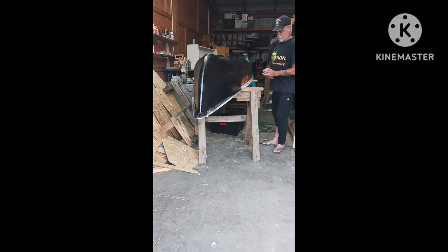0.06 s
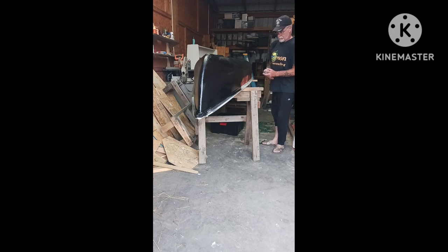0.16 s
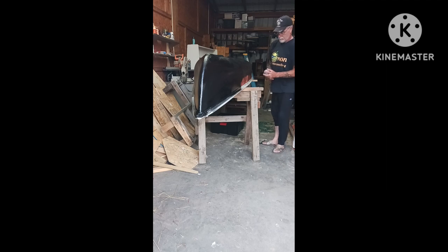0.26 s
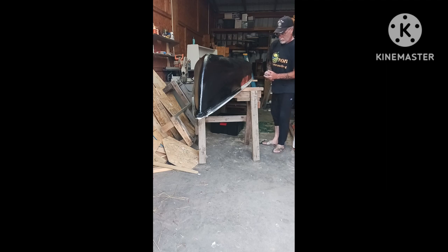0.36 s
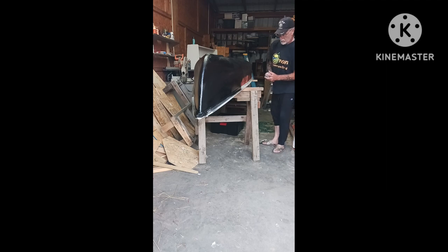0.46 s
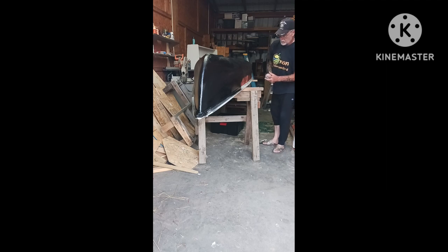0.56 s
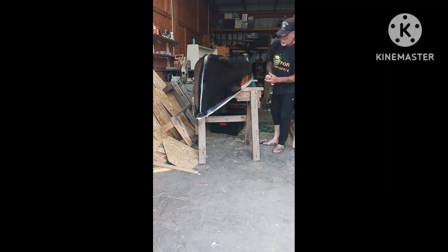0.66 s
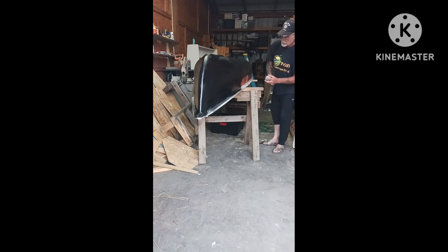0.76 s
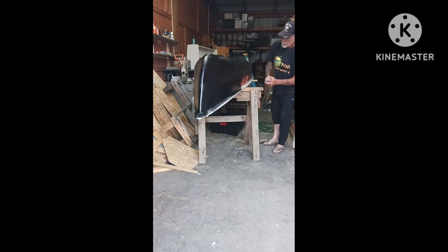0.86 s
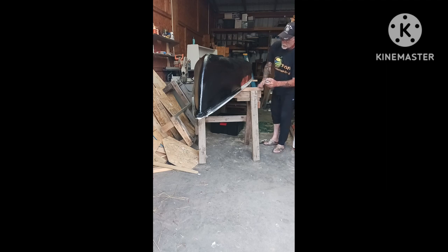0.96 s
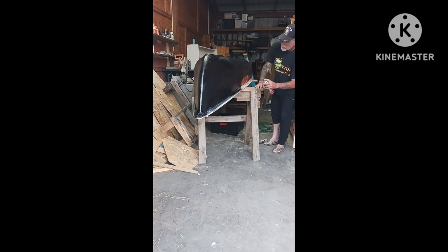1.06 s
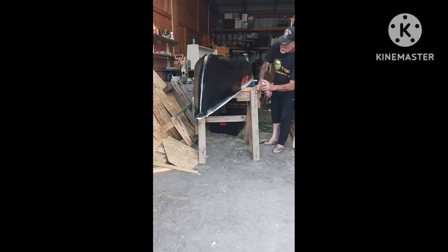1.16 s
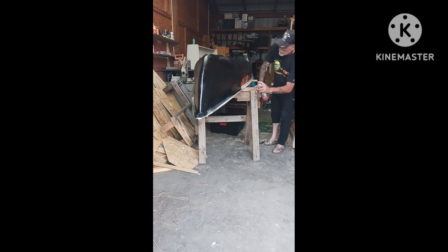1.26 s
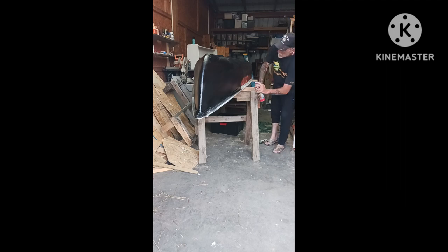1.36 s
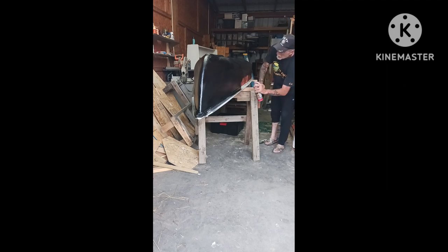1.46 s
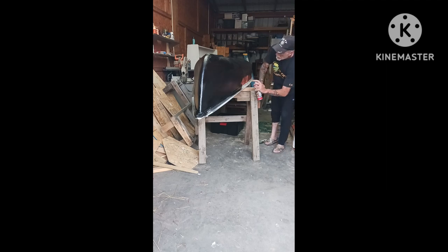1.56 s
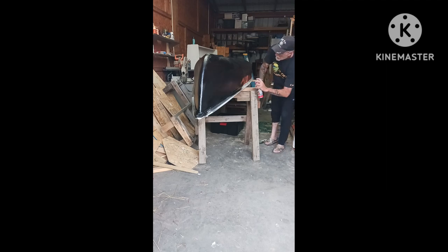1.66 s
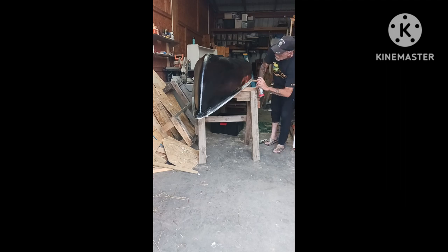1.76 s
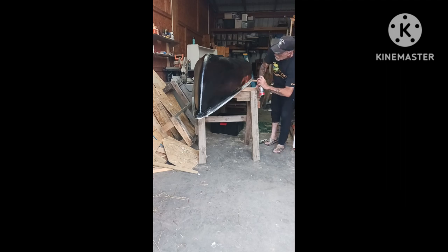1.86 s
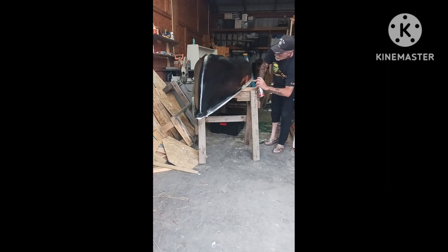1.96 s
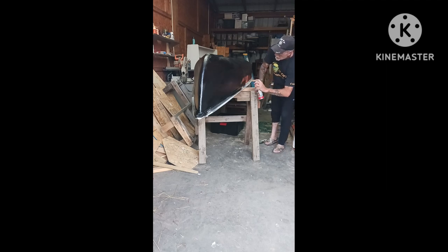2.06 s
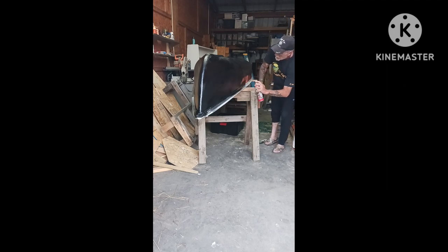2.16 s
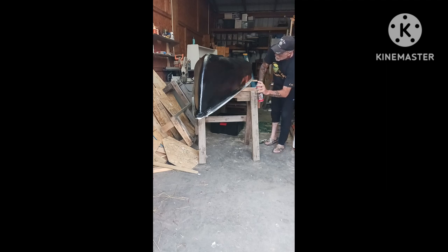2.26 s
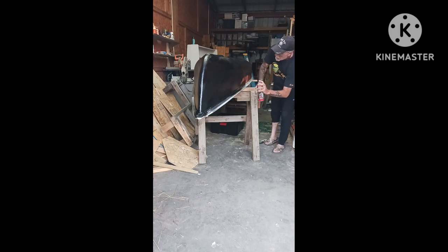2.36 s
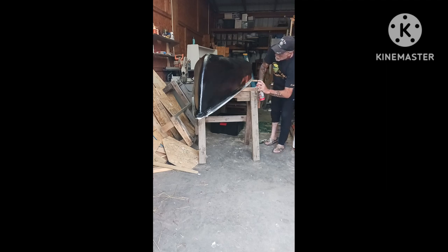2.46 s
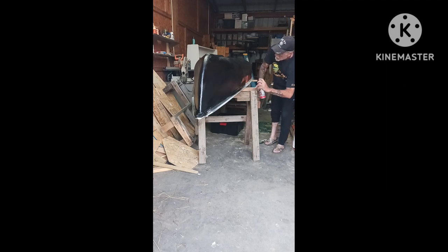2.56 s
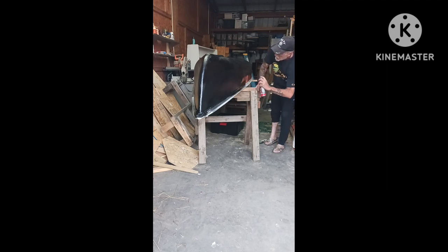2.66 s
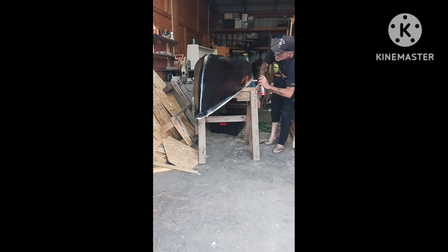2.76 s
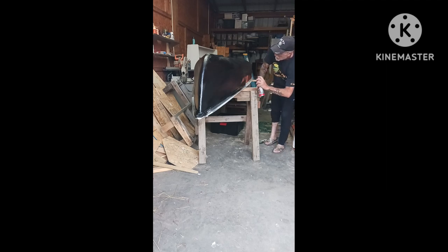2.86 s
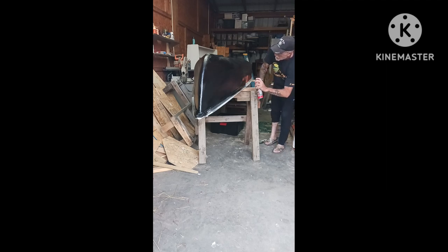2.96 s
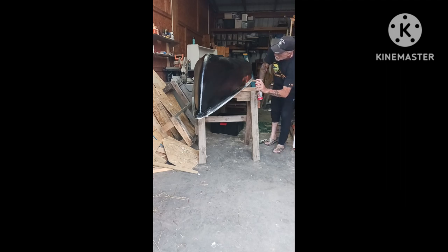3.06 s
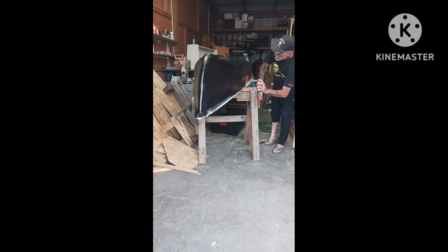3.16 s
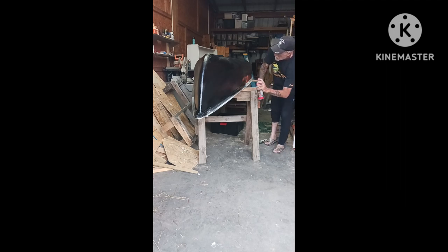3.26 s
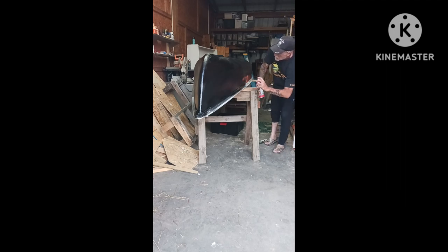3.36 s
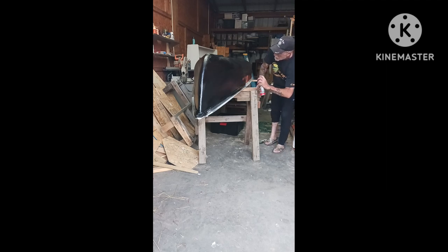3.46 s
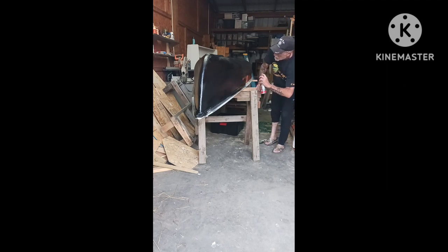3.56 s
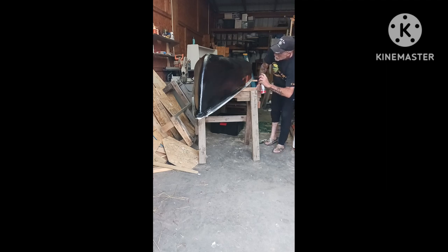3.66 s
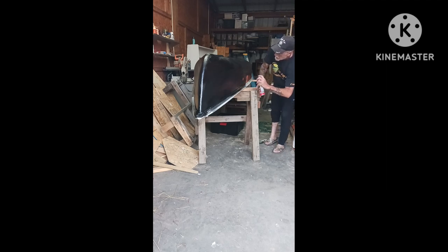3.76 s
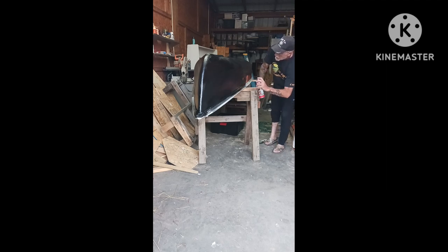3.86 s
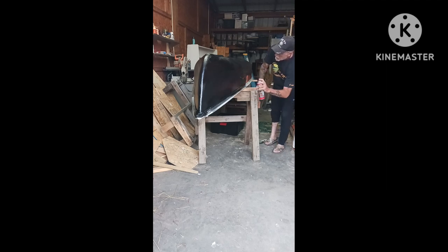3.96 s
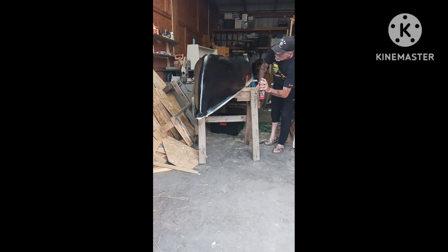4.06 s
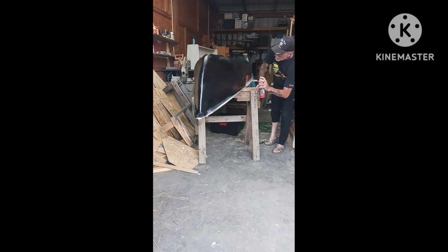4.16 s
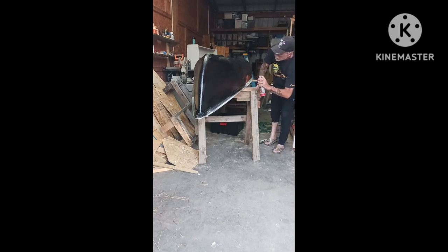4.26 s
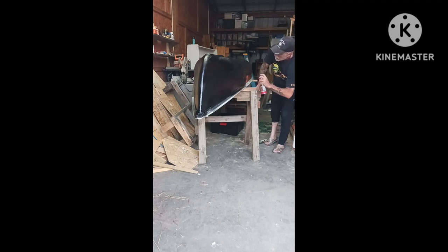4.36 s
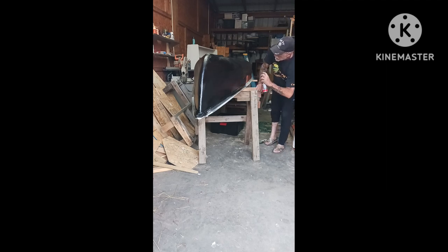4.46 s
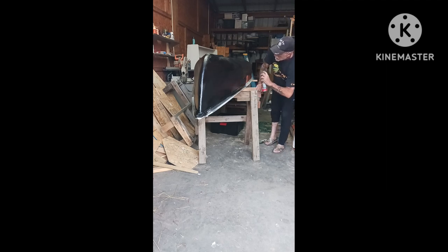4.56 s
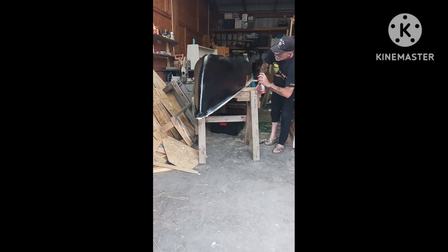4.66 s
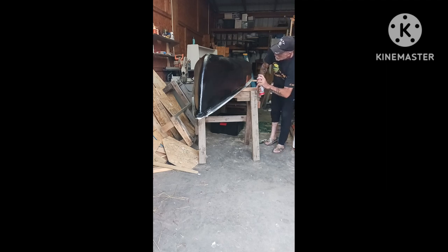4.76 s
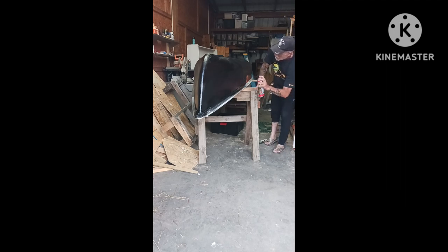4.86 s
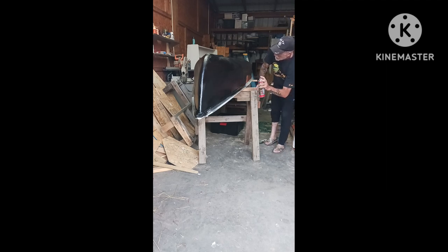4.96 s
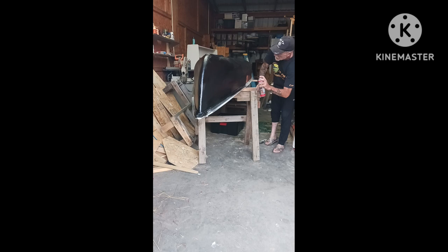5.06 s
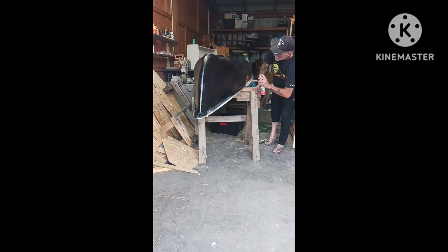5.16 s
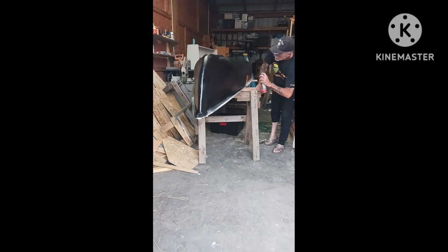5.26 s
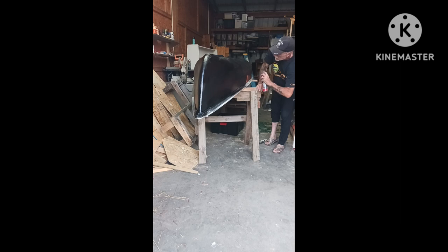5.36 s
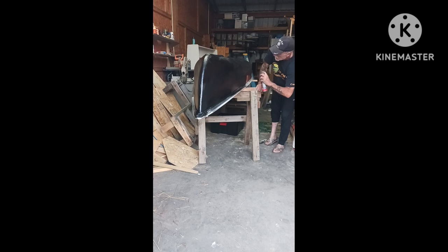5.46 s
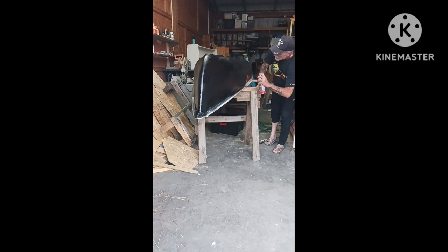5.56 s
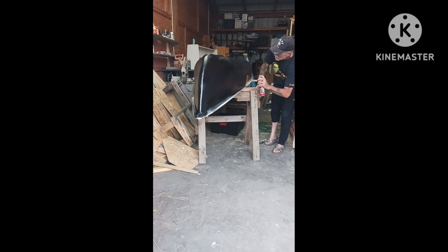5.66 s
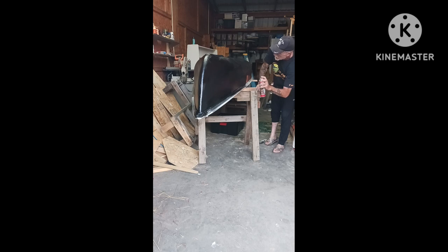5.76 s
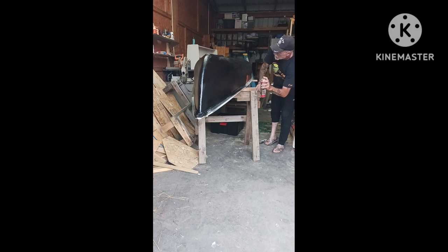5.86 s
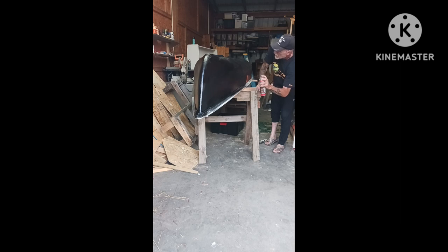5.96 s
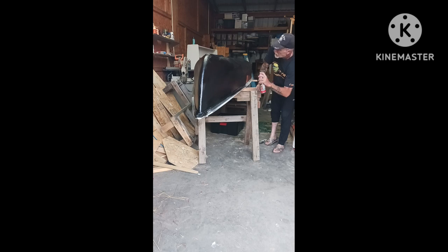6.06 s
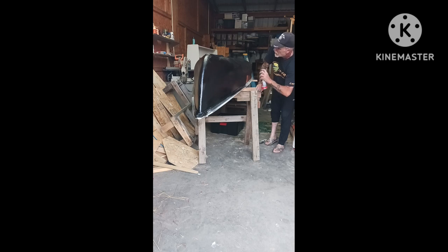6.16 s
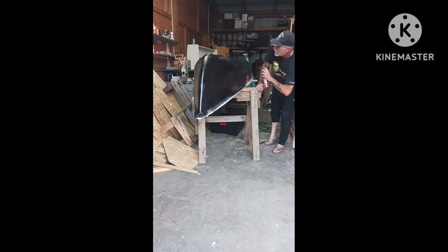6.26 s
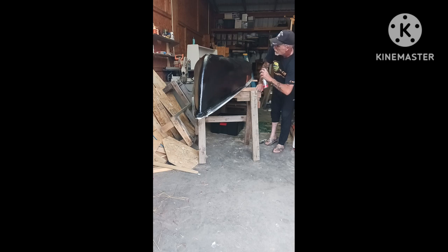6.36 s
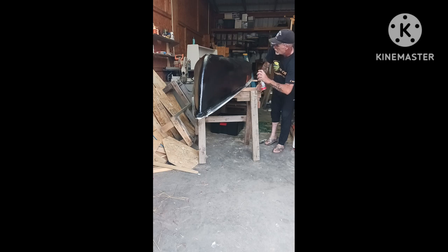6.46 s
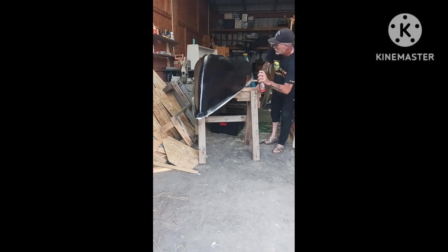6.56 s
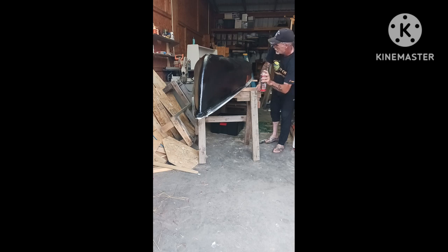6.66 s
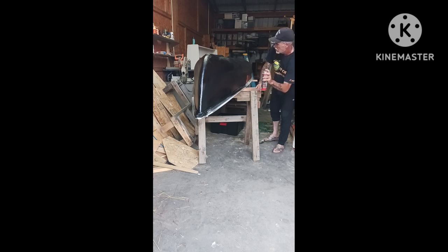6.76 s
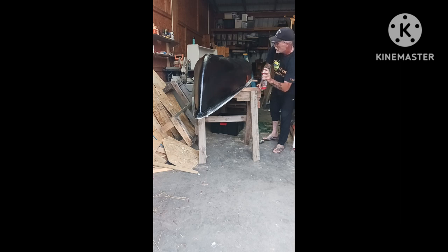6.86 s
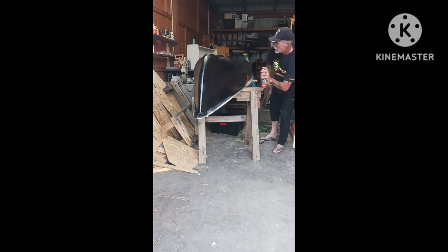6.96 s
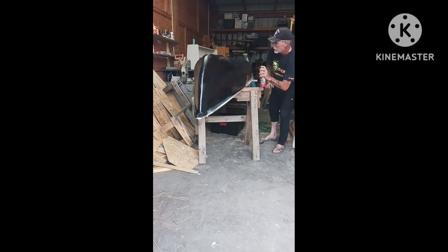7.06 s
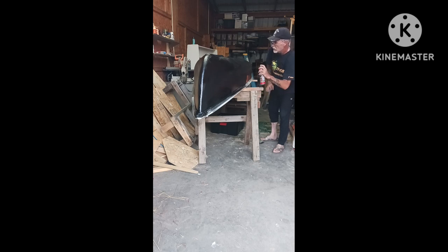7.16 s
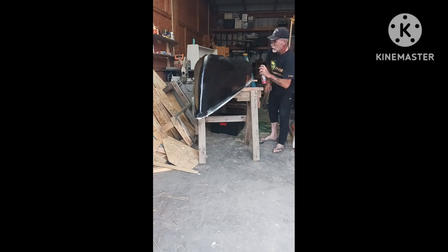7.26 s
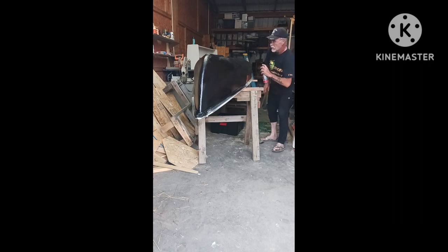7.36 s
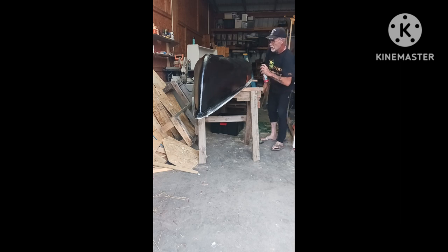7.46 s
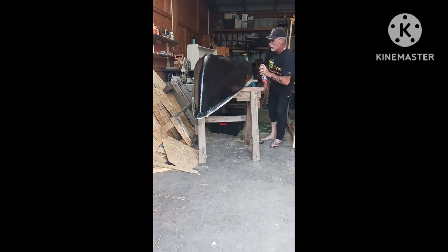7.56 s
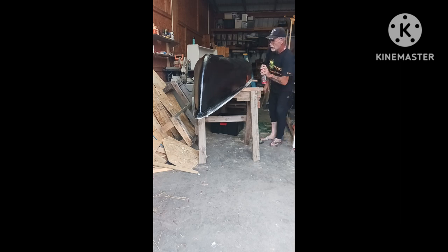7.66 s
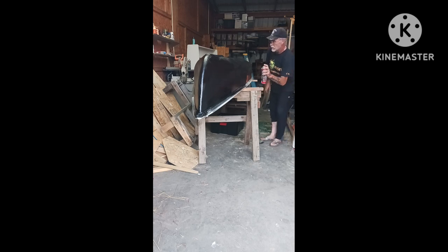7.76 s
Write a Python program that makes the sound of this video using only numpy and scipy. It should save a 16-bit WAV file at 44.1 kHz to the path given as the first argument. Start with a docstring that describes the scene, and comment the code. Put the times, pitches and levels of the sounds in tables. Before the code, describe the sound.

In a roomy workshop, sandals scrape gritty concrete during the first second, with tiny sharp grit cracks. From about one and a half seconds an aerosol can sprays a boat hull in fourteen crisp bursts, about two each second, alternating steady and brightening. A deep hum swells and sinks beneath soft air noise. Stereo microphone a few steps away; short diffuse room tails.

```python
"""Spray painting in a workshop

An aerosol can sprays a boat hull in fourteen short bursts: turbulent hiss, gated by a valve and combed by an echo.
Sandals scuff gritty concrete as trains of random grains, and single larger grains crack as decaying ticks.
The shed answers with diffuse noise tails that die at a different speed in each band.
A wavering low tone swells and sinks beside a faint drone, under the steady filtered noise of the air."""
import sys
import numpy as np
from scipy import signal
from scipy.fft import rfft, irfft, next_fast_len
from scipy.io import wavfile
from scipy.ndimage import map_coordinates

SR = 44100
rng = np.random.default_rng(int(sys.argv[2]) if len(sys.argv) > 2 else 0)


def file_out(sig):
    """Save sig as 16-bit WAV at sys.argv[1]."""
    # one column per channel
    cols = np.atleast_2d(sig).T
    # limit, then scale
    lim = np.clip(cols, -1, 1)
    pcm = np.round(lim * 32767).astype(np.int16)
    wavfile.write(sys.argv[1], SR, pcm)


N = 344862

# slow level of the hum, before its throb: (t/s, level/dB)
HUM_LEVEL = [(0.0, -49), (0.38, -59.5), (0.72, -49), (1.38, -62.5), (1.53, -39.5), (1.65, -41.5),
             (2.05, -59), (3.05, -55), (3.6, -79), (3.9, -55), (4.7, -71), (4.9, -52), (5.2, -48.5),
             (5.33, -60), (5.52, -42), (6.6, -40.5), (7.45, -43.5), (7.62, -52.5), (7.82, -46)]
HUM_HZ = 58.9  # mean pitch
HUM_STEADY_DB = -53  # above this level the hum is a clean tone, below it a fluttering rumble
THROB_S, THROB_DB, THROB_TOP_S = 0.773, 1.3, 6.63  # period, depth, time of one crest

# relative spectrum of the still air: (f/Hz, level/dB per Hz)
AIR_SPECTRUM = [(25, -27), (45, -3.5), (75, 2.5), (140, -2.5), (220, -7), (480, -8), (700, -17),
                (1500, -13.5), (2200, -23.5), (3400, -13), (7000, -14), (9000, -29.5), (11000, -30.5),
                (15000, -25)]
# left-right correlation of all diffuse sound in the shed: (f/Hz, correlation/1)
DIFFUSE_ALIKE = [(100, 0.92), (450, 0.88), (900, 0.42), (1800, 0.33), (3000, 0.0)]

# drags of a sole on concrete: (hardest push t/s, build-up/s, let-go/s, relative level/dB,
# weight on the foot as extra low-mid level/dB)
SCUFFS = [(0.121, 0.061, 0.038, -35, -1.5), (0.65, 0.24, 0.25, -56, -6), (0.87, 0.29, 0.14, -51.5, -3),
          (1.0, 0.071, 0.19, -58.5, 5), (6.03, 0.32, 0.08, -66, 7), (6.87, 0.12, 0.2, -60, -6),
          (7.497, 0.052, 0.025, -45.5, 2.5), (7.715, 0.067, 0.044, -38, 3.5)]
# relative spectrum of the rubbing sole: (f/Hz, level/dB per Hz)
SOLE_SPECTRUM = [(400, -20), (900, -25.5), (1400, -9), (2000, -5), (2700, -2.5), (3700, -1), (5000, -8),
                 (7000, -11.5), (10000, -12), (13000, -11), (15500, -22)]
# relative spectrum of the ticks of loose grit: (f/Hz, level/dB per Hz)
LOOSE_SPECTRUM = [(500, -20), (1500, -4), (3500, 5), (6000, -8), (13000, -9), (15500, -10)]
SCUFF_FADE_DB = -16  # relative pressure one build-up before the hardest push, and one let-go after it
SCUFF_LAND_S = 0.0079  # time for the sole to make contact
WEIGHT_HZ = 2410  # weight on the foot acts below this
RUB_STRAIGHT_HZ = 3440  # above this the rub is heard only through the shed

# reverberation time of the shed: (f/Hz, t60/s)
SHED_T60 = [(500, 0.37), (3500, 0.36), (8000, 0.25), (14000, 0.27)]

# grit cracking under a sole: (t/s, relative level/dB, ring f/Hz, share that rings/1)
GRIT_CRACKS = [(0.546, -34.5, 3420, 0.2), (0.8075, -40, 3620, 0), (0.9075, -39, 9000, 0.2),
               (0.974, -37, 3950, 0.4), (1.064, -43, 7000, 0.05), (7.468, -33.5, 3300, 0.2)]

# presses of the nozzle: (valve opens t/s, valve shuts t/s, relative hiss level at mid-stroke/dB,
# rise of the hiss over the stroke as the can turns/dB)
BURSTS = [(1.533, 1.875, -35.5, -3), (1.997, 2.298, -36.5, 8), (2.47, 2.782, -37, 0.5),
          (2.899, 3.182, -36.5, 6.5), (3.325, 3.633, -36.5, 0), (3.772, 4.07, -36.5, 6.5),
          (4.231, 4.549, -36.5, 0.5), (4.672, 4.961, -37, 7.5), (5.125, 5.437, -36.5, -1.5),
          (5.569, 5.861, -36, 5.5), (6.012, 6.298, -36, -2), (6.431, 6.682, -36.5, 6),
          (7.062, 7.402, -37, 0), (7.535, 7.807, -36, 8)]
# relative spectrum of the jet: (f/Hz, level/dB per Hz)
JET_SPECTRUM = [(500, -21), (900, -27.5), (1500, -14.5), (2200, -11.5), (2750, -7.5), (3600, -1),
                (4200, -3.9), (5000, -5.5), (5900, -10.5), (7300, -7), (10000, -7.5), (11200, -3.5),
                (12600, -0.5), (15500, 1.5)]
STROKE_END_DB = -1.2  # the can points a little aside at both ends of a stroke
BODY_DB, BODY_SWING = 0.2, 0.36  # body of the jet: level against the hiss, share of the turn it follows
SPIT_DB, SPIT_S = 2.5, 0.058  # pressure stored behind the valve spits as it opens
# gain of the part of the jet that gets straight past the hull: (f/Hz, level/dB)
DIRECT_GAIN = [(1800, -11.5), (2900, 3.5), (3900, 0.5), (5200, -8), (8000, -6.5), (14000, -3.5)]
# phase by which the straight sound of the can leads at the left port: (f/Hz, phase/rad)
LEAD_PHASE = [(100, 0), (1200, 0.4), (2000, 1.1), (2400, 2.2), (2850, 3.1), (3300, 3.4), (3700, 4.5),
              (4200, 6.1), (6700, 6.9), (7900, 9.4), (10000, 10), (13000, 12.5), (15000, 14)]

# colour of the two microphone ports: (f/Hz, left minus right level/dB)
PORT_COLOUR = [(150, 0), (450, 2), (1050, 6.5), (1700, 0), (3500, -0.5), (5000, 0), (6700, -6.5),
               (7600, 0.5), (9700, 4), (11500, 5), (14500, 1)]
EDGE_HZ = 15600  # upper band limit


def gain_of(db):
    """Logarithmic levels: decibels to amplitude gain."""
    return 10 ** (np.asarray(db) / 20)


def evened(x):
    """Normalization of power: scales x to rms 1."""
    return x / np.sqrt(np.mean(x ** 2) + 1e-20)


def read(points, hz):
    """Interpolation of a spectrum on a log-frequency axis."""
    f, value = np.transpose(points)
    return np.interp(np.log(hz + 1), np.log(f + 1), value)


def follow(rows):
    """Linear interpolation of a time curve at every sample."""
    return np.interp(np.arange(N) / SR, *np.transpose(rows))


def coloured(x, gain):
    """Linear filtering: multiplies the spectrum of x by a function of frequency."""
    size = next_fast_len(N + 4096)
    response = gain(np.fft.rfftfreq(size, 1 / SR))
    return irfft(rfft(x, size) * response, size)[..., :N]


def shaped(x, spectrum):
    """Spectral shaping: filters x by a tabulated spectrum, at rms 1."""
    return evened(coloured(x, lambda hz: gain_of(read(spectrum, hz))))


def below(x, edge_hz, order=6):
    """Low-pass filtering without phase shift."""
    return coloured(x, lambda hz: 1 / (1 + (hz / edge_hz) ** order))


def wander(rate_hz):
    """Slow random fluctuation: low-passed noise of rms 1, up to about the given rate."""
    return evened(below(rng.standard_normal(N), rate_hz, order=4))


def late(x, delay_ms):
    """Propagation delay: x after a fixed or moving delay."""
    return map_coordinates(x, [np.arange(N) - delay_ms * SR / 1000], order=3, mode="constant")


def hum(waver=0.11, drift_hz=0.28, flutter_hz=9, flutter_db=-1.5, drone_hz=187.3, drone_db=-78.0):
    """Amplitude and frequency modulation: a tone, steady when loud and fluttering when weak, and a drone."""
    throb_turns = (np.arange(N) / SR - THROB_TOP_S) / THROB_S
    level = gain_of(follow(HUM_LEVEL) + THROB_DB * np.cos(2 * np.pi * throb_turns))
    steady = 1 / (1 + (gain_of(HUM_STEADY_DB) / level) ** 4)
    # a complex random envelope turns the tone into narrow-band noise
    flutter = gain_of(flutter_db) * (wander(flutter_hz) + 1j * wander(flutter_hz)) / np.sqrt(2)
    swing = np.sqrt(steady) * (1 + waver * wander(21)) + np.sqrt(1 - steady) * flutter
    turns = np.cumsum(HUM_HZ + drift_hz * wander(2.1)) / SR
    low = level * (swing * np.exp(2j * np.pi * turns)).real
    drone_turns = np.cumsum(drone_hz + wander(2.64)) / SR
    drone = gain_of(drone_db) * np.sin(2 * np.pi * drone_turns)
    return np.sqrt(2) * (low + drone)  # sine of amplitude sqrt(2) has rms 1


def diffuse_alike(hz):
    """Spatial coherence of the diffuse field at the two ports."""
    return np.clip(read(DIFFUSE_ALIKE, hz), -1, 1)


def air(air_db=-54, swell_db=0.5, rumble_db=-19.5, rumble_hz=135, rumble_width_hz=70):
    """Partly coherent noise: diffuse air, and a resonant rumble whose level follows the hum."""
    left, other, rumble_noise = rng.standard_normal((3, N))
    right = coloured(left, diffuse_alike) + coloured(other, lambda hz: np.sqrt(1 - diffuse_alike(hz) ** 2))
    still = shaped(np.array([left, right]), AIR_SPECTRUM) * gain_of(air_db + swell_db * wander(2.65))

    def rumble_gain(hz):
        """Resonance curve with an added roll-off above 600 Hz."""
        detuning = (hz - rumble_hz ** 2 / (hz + 1)) / rumble_width_hz
        return 1 / np.hypot(1, detuning) / (1 + (hz / 600) ** 4)

    rumble = evened(coloured(rumble_noise, rumble_gain))
    return still + rumble * gain_of(follow(HUM_LEVEL) + rumble_db)


def drag(push, build_s, let_go_s):
    """Frictional loading: the sole lands, builds to its hardest push and lets go."""
    t = np.arange(N) / SR
    away = np.maximum((push - t) / build_s, (t - push) / let_go_s)
    contact = np.clip((t - push + build_s) / SCUFF_LAND_S, 0, 1)
    return contact * gain_of(SCUFF_FADE_DB * np.minimum(away, 10))


def sandals(grains_per_s=4000, grain_spread_db=4.5, smooth=0.46,
            loose_per_s=110, loose_db=-6.0, loose_top_db=-52):
    """Granular friction as random impulses: a dense rub and sparse ticks of capped level; gives (rub, ticks)."""
    sizes = gain_of(grain_spread_db * np.minimum(rng.exponential(1, N), 4)) * rng.choice([-1, 1], N)
    grains = evened(sizes * (rng.random(N) < grains_per_s / SR))
    texture = shaped(grains + smooth * rng.standard_normal(N), SOLE_SPECTRUM)
    low_mid = below(texture, WEIGHT_HZ)
    loose = shaped(sizes * (rng.random(N) < loose_per_s / SR), LOOSE_SPECTRUM)
    rub, ticks = np.zeros(N), np.zeros(N)
    for push, build_s, let_go_s, level_db, weight_db in SCUFFS:
        pressure = drag(push, build_s, let_go_s)
        weighted = texture + (gain_of(weight_db) - 1) * low_mid
        rub += pressure * gain_of(level_db) * weighted
        ticks += pressure * gain_of(min(level_db, loose_top_db) + loose_db) * loose
    return rub, ticks


def tail(clutter=1.0, clutter_s=0.01):
    """Diffuse reverberation: stronger early scatter, then exponential decay at each band's own speed."""
    t = np.arange(SR // 3) / SR
    scatter = rng.standard_normal((2, len(t))) * (1 + clutter * np.exp(-t / clutter_s))
    hz, age, z = signal.stft(scatter, SR, nperseg=128)
    alike = diffuse_alike(hz)[:, None]
    z = np.array([z[0], alike * z[0] + np.sqrt(1 - alike ** 2) * z[1]])
    decay = gain_of(-60 * age / read(SHED_T60, hz)[:, None])
    answer = signal.istft(z * decay, SR, nperseg=128)[1]
    return answer / np.linalg.norm(answer[0])


def shed(x, count):
    """Time-varying reverberation: the source moves, so each stretch meets its own set of reflections."""
    hop = N // count + 1
    fade = np.sin(np.pi * np.arange(2 * hop) / (2 * hop))  # overlapping powers sum to 1
    padded = np.pad(x, (hop, 2 * hop))
    out = np.zeros((2, N + 3 * hop + SR))
    for start in range(0, N + hop, hop):
        stretch = padded[start:start + 2 * hop] * fade
        answer = signal.fftconvolve(stretch[None], tail(), axes=1)
        out[:, start:start + answer.shape[1]] += answer
    return out[:, hop:hop + N]


def grit(decay_s=0.00094, ring_s=0.0052, crack_db=-1.5, dull_hz=7000, thin_hz=1100):
    """Impulsive fracture: larger grains crack with a short noise tick, dulled by the sole, and may ring."""
    out, t = np.zeros(N), np.arange(1024) / SR
    for crack_s, level_db, hz, rings in GRIT_CRACKS:
        tick = np.exp(-t / decay_s) * rng.standard_normal(len(t))
        ring = np.exp(-t / ring_s) * np.sin(2 * np.pi * hz * t)
        crack = (1 - rings) * tick + rings * ring
        out[round(crack_s * SR):][:len(t)] += gain_of(level_db + crack_db) * crack
    return coloured(out, lambda hz: hz / np.hypot(hz, thin_hz) / np.hypot(1, hz / dull_hz))


def resonate(x, hz, width_hz):
    """Resonance by frequency shifting: a one-pole filter of peak gain 1 follows the curve hz."""
    turn = np.exp(2j * np.pi * np.cumsum(hz) / SR)
    r = np.exp(-np.pi * width_hz / SR)
    return 2 * (turn * signal.lfilter([1 - r], [1, -r], x / turn)).real


def spray(open_s=0.015, shut_s=0.0085, sputter_db=0.87, jet_db=1.5, split_hz=7000,
          nozzle_hz=13400, nozzle_width_hz=1100, nozzle_db=-11.5):
    """Turbulent jet noise: gas escapes while the valve is open; paint droplets make it flutter."""
    t, high, low = np.arange(N) / SR, np.zeros(N), np.zeros(N)
    for opens, shuts, level_db, rise_db in BURSTS:
        on = (t > opens) & (t < shuts)
        valve = np.clip((t[on] - opens) / open_s, 0, 1) * np.clip((shuts - t[on]) / shut_s, 0, 1)
        stroke = np.linspace(-1, 1, on.sum())
        turn_db = rise_db * stroke / 2 + STROKE_END_DB * stroke ** 2
        spit_db = SPIT_DB * np.exp((opens - t[on]) / SPIT_S)
        high[on] = valve * gain_of(level_db + turn_db + spit_db)
        # the body of the jet beams less than its hiss, so turning the can moves it less
        low[on] = valve * gain_of(level_db + BODY_SWING * turn_db + BODY_DB)
    gas = shaped(rng.standard_normal(N), JET_SPECTRUM)
    body = below(gas, split_hz)
    # a broad sizzle at the orifice drifts with the finger's pressure
    drift = 1 + 0.055 * wander(3)
    orifice = resonate(rng.standard_normal(N), nozzle_hz * drift, nozzle_width_hz)
    sizzle = gain_of(nozzle_db) * evened(orifice)
    jet = low * body + high * (gas - body + sizzle)
    return jet * gain_of(jet_db + sputter_db * wander(94))


def hull(jet, echo=0.35, gap_ms=1.2, sway_ms=0.256):
    """Comb filtering: the hull close behind the nozzle returns the hiss, and the comb shifts with the hand."""
    return jet + echo * late(jet, gap_ms + sway_ms * wander(2.14))


def straight(x):
    """Interaural-style phase difference: the left port leads, by an amount that shifts as the hand moves."""
    right = coloured(x, lambda hz: np.exp(-1j * read(LEAD_PHASE, hz)))
    return np.array([x, late(right, 0.008 * wander(2))])


def scene(feet_db=-1.5, feet_room_db=-1.1, grit_room_db=2.0):
    """Superposition: direct and reverberant sound of can and feet, over hum and air."""
    jet = hull(spray())
    rub, ticks = sandals()
    cracks = grit()
    direct = coloured(jet, lambda hz: gain_of(read(DIRECT_GAIN, hz)))
    can = straight(direct) + shed(jet, count=48)
    near = gain_of(feet_db) * below(rub, RUB_STRAIGHT_HZ) + ticks + cracks
    feet_in_shed = shed(gain_of(feet_room_db) * rub + gain_of(grit_room_db) * cracks, count=24)
    return can + near + feet_in_shed + hum() + air()


def record(dry, bass_lead=0.53, corner_hz=50):
    """Two-port reception: each port has its own colour, the left leads in the bass (rad); then a band limit."""
    half = np.array([[.5], [-.5]])  # each difference is split evenly between left and right

    def port_response(hz):
        """Complex response of both ports; the phase lead is greatest at corner_hz."""
        lead = bass_lead * 2 * hz * corner_hz / (hz ** 2 + corner_hz ** 2)
        return gain_of(half * read(PORT_COLOUR, hz)) * np.exp(1j * half * lead)

    ports = coloured(dry, port_response)
    band_limit = signal.firwin(511, EDGE_HZ, window=("kaiser", 9), fs=SR)
    return signal.oaconvolve(ports, band_limit[None], "same")


dry = scene()
out = record(dry)
file_out(out)
```